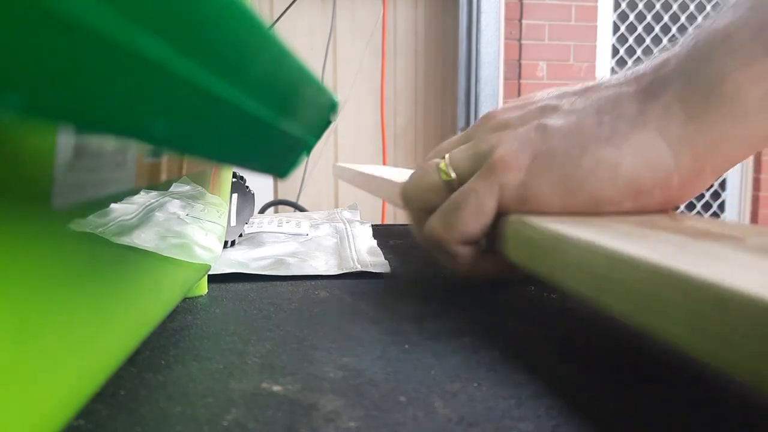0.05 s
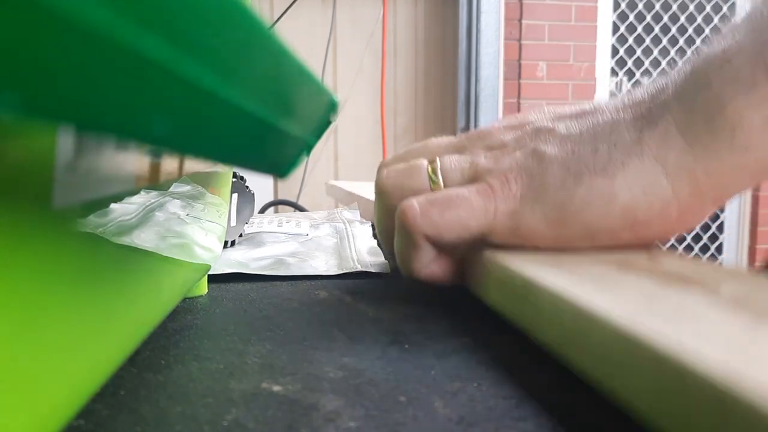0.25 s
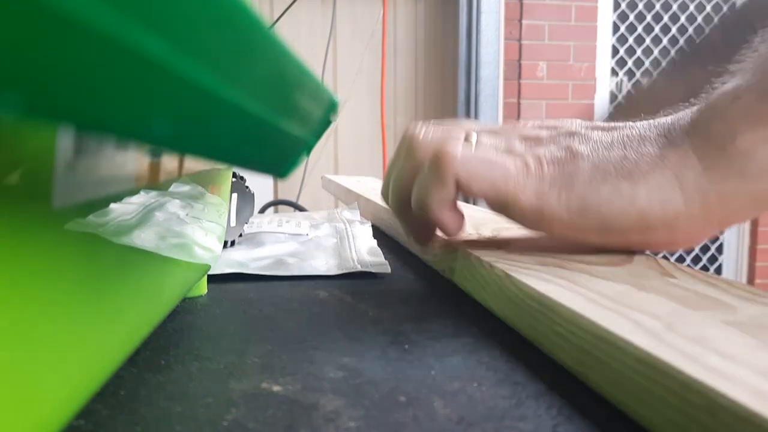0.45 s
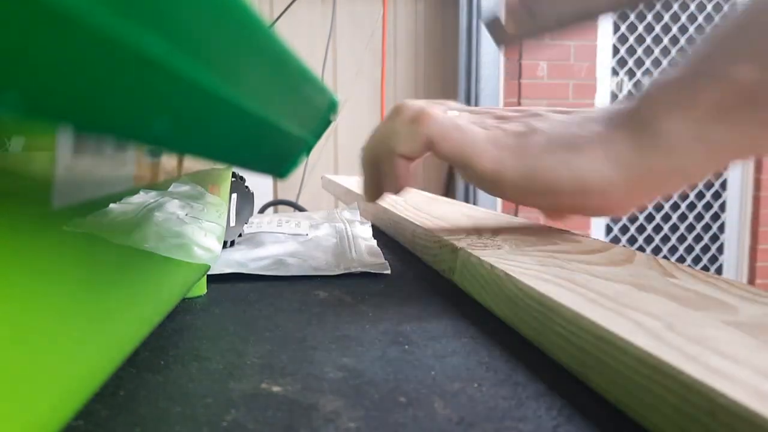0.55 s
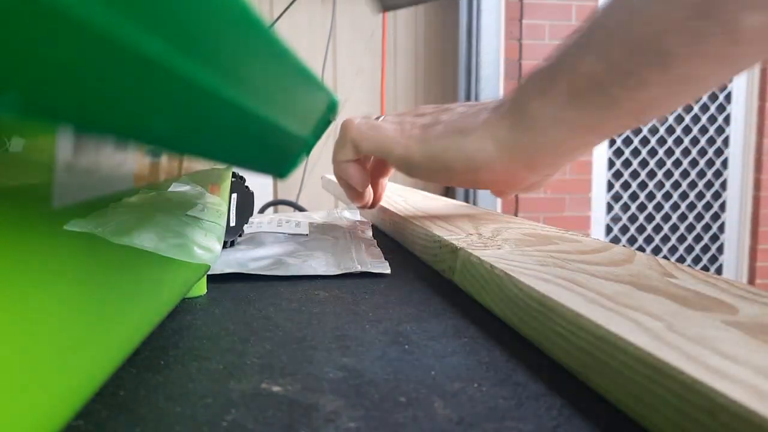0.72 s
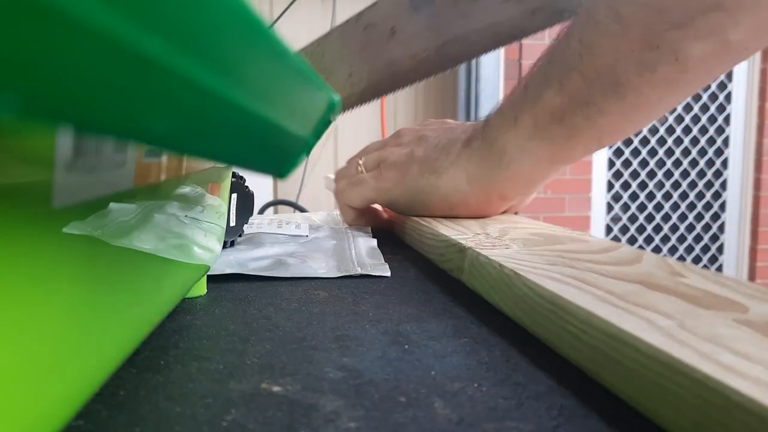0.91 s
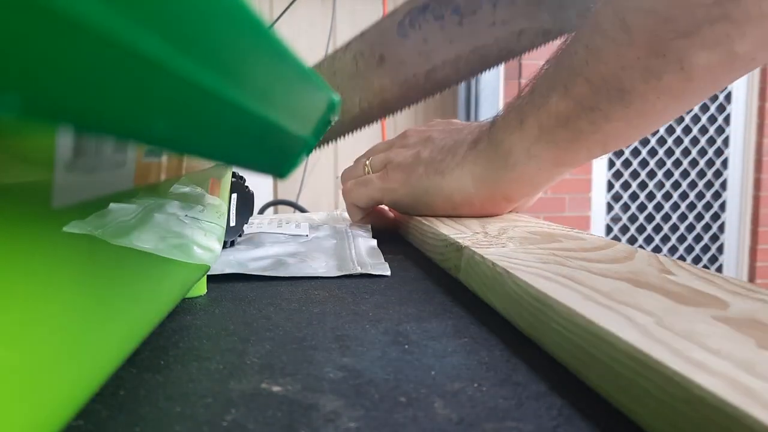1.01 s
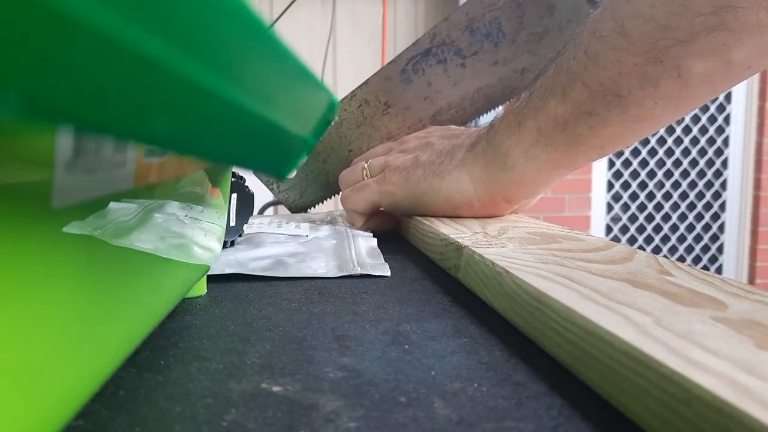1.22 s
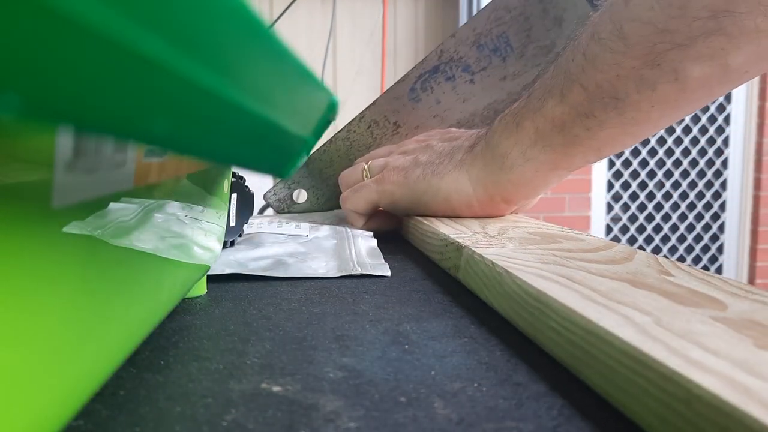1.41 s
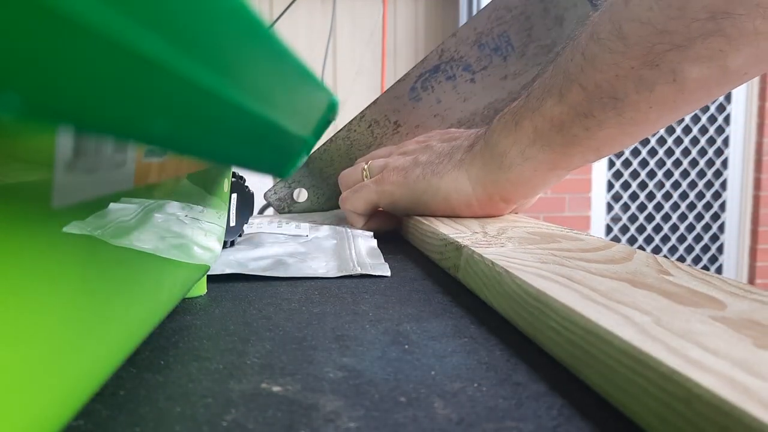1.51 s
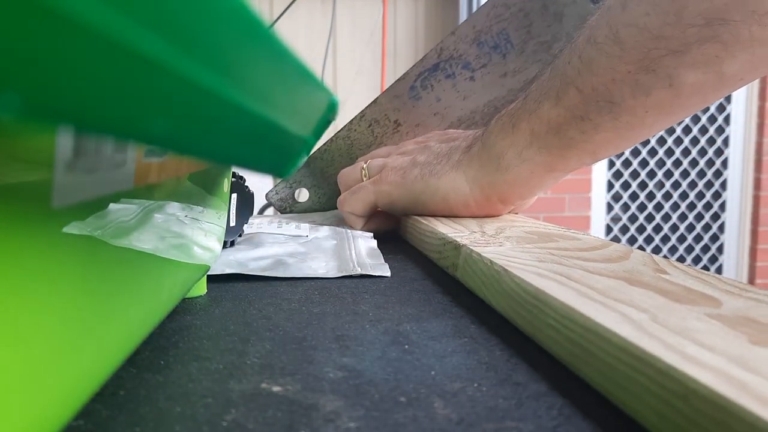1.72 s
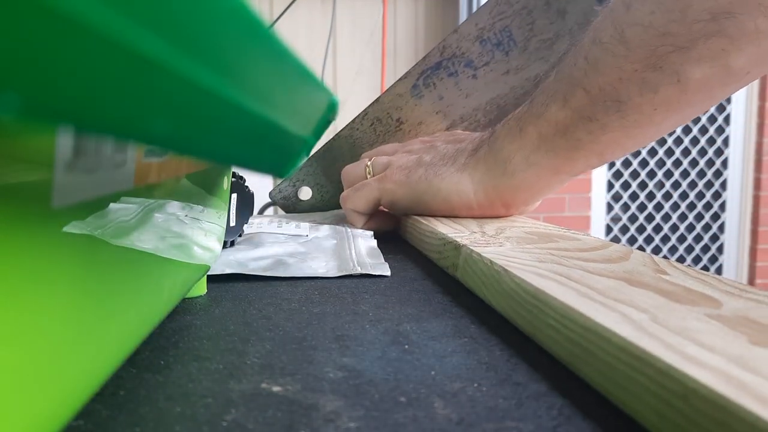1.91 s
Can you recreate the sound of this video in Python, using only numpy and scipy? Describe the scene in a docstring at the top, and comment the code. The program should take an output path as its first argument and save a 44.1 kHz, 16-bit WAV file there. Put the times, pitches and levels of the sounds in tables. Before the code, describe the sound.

A wooden board is set on a workbench: light sliding from the start, a rasp swelling near 0.2 s, and loud hollow knocks at 0.2-0.35 s with a sharp tick, smaller bounces to 0.53 s and thin squeaks. Quieter rubbing follows. At 0.92 s a tick and a strong short scrape, with squeaks until 1.3 s. Soft taps near 1.45 s, gentle rubs at 1.6 and 1.85 s, over faint yard wash.

```python
"""A pine board is set down on a workbench in an open shed, over the quiet wash of the yard.
Sliding is under way from the start: grain catches ring the wood, filtered noise rasps and hisses.
Board and bench soon knock and bounce, as short pushes on their modes; thin wavering squeaks, likely
a blade being rubbed, come among the knocks; hard edges tick now and then, as short bursts of noise.
The left microphone is nearer the bench and dull in the treble."""
import sys
import numpy as np
from scipy import signal
from scipy.io import wavfile
from scipy.ndimage import uniform_filter1d

SR = 44100
rng = np.random.default_rng(int(sys.argv[2]) if len(sys.argv) > 2 else 0)


def amplitude_ratio(level_db):
    """Convert a level in decibels to the matching linear amplitude (field) ratio."""
    exponent = np.asarray(level_db, float) / 20
    return 10 ** exponent


def persist_wave(psi):
    """Save psi, clipped to +-1, as 16-bit WAV."""
    counts = np.round(np.clip(psi, -1, 1) * 32767).astype(np.int16)
    wavfile.write(sys.argv[1], SR, np.atleast_2d(counts).T)


N = 85995  # samples

# Modes of the pine board. Each row: frequency in Hz, left level in dB, right level in dB, t60 in s.
BOARD_MODES = [(186.4, -1.5, -4, 0.19), (269, -14.5, -6, 0.044), (334.7, 3.5, -2.5, 0.11),
               (382, -7, -7, 0.14), (409.1, 3, -1, 0.076), (490, -1, -27, 0.074), (797.4, -7, -24, 0.054),
               (1527, -33, -7, 0.04)]
# Modes of the workbench. Each row: frequency in Hz, left level in dB, right level in dB, t60 in s.
BENCH_MODES = [(75.6, -37, -34, 1), (123.8, -8, -11, 0.29), (253.9, -9.5, -20.5, 0.17),
               (321.2, -8, -8, 0.18), (394.4, -4, -18, 0.11), (455.3, 8, -20, 0.087),
               (551.5, -9, -6.5, 0.059), (641.6, -9, -27, 0.19), (821.6, -5, -25.5, 0.052),
               (951.5, -9.5, -16, 0.072), (1265, -2, -7, 0.02), (1731, -21, 1, 0.036)]
# Response of the left microphone to the noises and squeaks. Each row: frequency in Hz, gain in dB.
LEFT_RESPONSE = [(900, 7), (2500, -2), (5000, -5.5), (6500, -22), (9000, -20), (14000, -14)]


def evened(x):
    """Scales to unit rms."""
    return x / np.sqrt(np.mean(x ** 2) + 1e-20)


def read(points, hz):
    """Reads a spectrum in dB on a log frequency axis."""
    f, value = np.transpose(points)
    return np.interp(np.log(hz + 1), np.log(f + 1), value)


def colour(x, *spectra):
    """Minimum-phase filter with the summed dB shape, so nothing sounds ahead of its cause."""
    hz = np.abs(np.fft.fftfreq(4096, 1 / SR))
    log_gain = np.log(amplitude_ratio(sum(read(s, hz) for s in spectra)))
    phase = -signal.hilbert(log_gain).imag
    taps = np.fft.ifft(np.exp(log_gain + 1j * phase)).real[:2048]
    return signal.oaconvolve(x, taps)[:N]


def microphones(left, right, shape):
    """Gives both sides the source's colour, and the left one its microphone's response too."""
    return np.array([colour(left, shape, LEFT_RESPONSE), colour(right, shape)])


def ring(force, modes):
    """Rings decaying sines by a force; each swells over a cycle or so and its right phase lags."""
    swell_cycles, lag_s = 0.39, 0.0001
    t = np.arange(SR // 2) / SR
    heard_at = t - np.array([[0], [lag_s]])
    body = np.zeros((2, len(t)))
    for hz, left_db, right_db, t60 in modes:
        decay = amplitude_ratio([[left_db], [right_db]] - 60 * t / t60)
        swell = 1 - np.exp(-t * hz / swell_cycles)
        body += decay * swell * np.sin(2 * np.pi * hz * heard_at)
    return signal.fftconvolve(force[None], body, axes=1)[:, :N]


def air():
    """The quiet wash of the yard: patchy noise, shared by both sides in the bass, apart above."""
    # Colour of the wash. Each row: frequency in Hz, relative level in dB per Hz.
    wash = [(60, -7), (90, 9.5), (200, -6.5), (600, -8), (1000, -22), (2500, -35.5), (4700, -32),
            (9500, -43.5), (16000, -36)]
    # Balance of the microphones. Each row: frequency in Hz, left minus right in dB.
    balance = [(100, -3), (500, 7), (1600, 11), (4500, -7.5), (9000, -17.5), (15000, -10.5)]
    level_db, same_up_to_hz, patch_db = -57.5, 610, 0.39
    frames, hz = N // 256 + 5, np.fft.rfftfreq(1024, 1 / SR)
    a, b, c, d, patches = rng.standard_normal((frames, 513, 5)).T
    patches = evened(uniform_filter1d(uniform_filter1d(patches, 10, axis=0), 10, axis=1))
    same = 1 / (1 + (hz[:, None] / same_up_to_hz) ** 2)
    left = a + 1j * b
    right = same * left + np.sqrt(1 - same ** 2) * (c + 1j * d)
    tilt = read(balance, hz)[:, None] / 2
    shape_db = read(wash, hz)[:, None] + patch_db * patches + np.array([tilt, -tilt])
    noise = signal.istft(np.array([left, right]) * amplitude_ratio(shape_db), nperseg=1024, noverlap=768)[1]
    return amplitude_ratio(level_db) * evened(noise[:, :N])


def streaked(x):
    """Narrow resonances come and go as the contact moves along the grain."""
    streak_db = 5  # rms
    z = signal.stft(x, nperseg=512, noverlap=384)[2]
    bands = rng.standard_normal(z.shape[:0:-1]).T
    bands = evened(uniform_filter1d(uniform_filter1d(bands, size=2, axis=0), size=24, axis=1))
    return signal.istft(z * amplitude_ratio(streak_db * bands), nperseg=512, noverlap=384)[1][:, :N]


def sliding():
    """Grain catches rattle the wood; the faces rasp and hiss. The hand never holds quite still."""
    # Strokes. Each row: start, fastest moment and end in seconds, then the levels of
    # the rumble in the wood, the rasp and the hiss in dB.
    strokes = [(-.3, 0.002, 0.28, -44.5, -58, -67.5), (0.033, 0.193, 0.64, -41, -32.5, -49.5),
               (0.639, 0.877, 1.76, -63.5, -47, -59), (0.906, 0.952, 1.107, -22.5, -34, -65),
               (1.477, 1.61, 1.767, -36, -48, -71), (1.771, 1.836, 2.32, -37, -43.5, -62.5)]
    # Colour of the rasp. Each row: frequency in Hz, gain in dB.
    rasp_shape = [(900, -9.5), (2200, -3.5), (3200, -10.5), (5000, -13), (8000, -23)]
    # Colour of the hiss. Each row: frequency in Hz, gain in dB.
    hiss_shape = [(3000, -23.5), (5000, 7.5), (9500, -4.5), (12500, -10.5), (16000, -24)]
    still_db, bench_db = -71.5, -9
    grains_per_s, grain_db, bright = 830, 3, 0.42
    t, level = np.arange(N) / SR, np.zeros((3, N))
    level[0] = amplitude_ratio(still_db)
    for start, fastest, end, *db in strokes:
        speed = np.interp(t, [start, fastest, end], [0, 1, 0])
        level += amplitude_ratio(db)[:, None] * speed ** 2

    # Random catches of either sign, each widened to 16 samples and followed by a weaker opposite push
    caught = rng.random((2, N)) < grains_per_s / SR
    size = amplitude_ratio(grain_db * np.minimum(rng.exponential(1, (2, N)), 5)) * caught
    force = evened(uniform_filter1d(size * rng.choice([-1, 1], (2, N)), size=16, axis=1))
    force = level[0] * (force - bright * np.roll(force, 16, axis=1)) / SR ** .5
    rumble = ring(force[0], BOARD_MODES) + amplitude_ratio(bench_db) * ring(force[1], BENCH_MODES)

    a, b, c, d, flicker = rng.standard_normal((N, 5)).T
    flicker_gain = amplitude_ratio(1.5 * evened(uniform_filter1d(flicker, size=300)))
    rasp_level, hiss_level = level[1:] * flicker_gain
    rasp = microphones(a * rasp_level, b * rasp_level, rasp_shape)
    hiss = microphones(c * hiss_level, d * hiss_level, hiss_shape)
    return rumble + streaked(rasp + hiss)


def knocks():
    """Each contact is a short smooth push on board and bench; a woody clack favours short ones."""
    # Contacts. Each row: start in seconds, push on the board in dB, push on the bench in dB,
    # contact time in ms.
    contacts = [(0.1432, -38, -53, 0.93), (0.17, -79, -29, 1.7), (0.2017, -8.5, -14.5, 0.74),
                (0.2142, -46, -26, 4.4), (0.2506, -11, -22, 1.11), (0.3254, -40.5, -12, 0.54),
                (0.3278, -41, -10, .7), (.340, -18, -29, 2.3), (0.429, -25.5, -25, 1.25),
                (0.453, -21.5, -40.5, 2.45), (.492, -43, -20, 1.9), (0.527, -32, -34, 2.94),
                (0.872, -43, -53.5, 0.58), (.950, -68, -31.5, 0.45), (0.966, -32.5, -46, 3.5),
                (1.001, -33, -44.5, 2.97), (1.032, -32, -36, 2.6), (1.088, -42, -37.5, 3.6),
                (1.4412, -48, -37.5, 0.99), (1.447, -40.5, -26, 1.5), (1.450, -37, -23.5, 4.7),
                (1.47, -40.5, -35.5, 2.5), (1.632, -35, -39.5, 3.3), (1.881, -37.5, -37, 1.4)]
    # Colour of the clack. Each row: frequency in Hz, gain in dB.
    clack_shape = [(150, -25.5), (450, 5), (1100, -3), (2500, -14), (4500, -55.5)]
    clack_db, clack_left_db, clack_decay_s, board_cut_hz = -10.5, 1.5, 0.0093, 131
    t, push, clack = np.arange(N) / SR, np.zeros((2, N)), np.zeros(N)
    for start, board_db, bench_db, ms in contacts:
        progress = np.clip((t - start) / (ms / 1000), 0, 1)
        pulse = np.sin(np.pi * progress) ** 2
        push += amplitude_ratio([[board_db], [bench_db]]) * pulse / pulse.sum()
        hardness = (amplitude_ratio(board_db) + amplitude_ratio(bench_db)) / ms ** 2
        clack += hardness * progress * np.exp(-np.maximum(t - start, 0) / clack_decay_s)
    left, right = rng.standard_normal((N, 2)).T * clack * amplitude_ratio(clack_db)
    bass_cut = signal.butter(2, board_cut_hz, "high", fs=SR)
    board = signal.lfilter(*bass_cut, ring(push[0], BOARD_MODES))
    bench = ring(push[1], BENCH_MODES)
    return microphones(left * amplitude_ratio(clack_left_db), right, clack_shape) - board - bench


def whistles():
    """Thin squeaks, likely a blade being rubbed: narrow lines catch quickly, waver and fade."""
    # Thin squeaks. Each row: start in seconds, length in seconds, frequency in Hz, level in dB.
    squeaks = [(.257, .07, 5780, -48), (.275, .08, 4290, -57), (.325, .06, 4450, -57),
               (.365, .09, 4580, -54), (.43, .2, 4520, -63), (.70, .09, 2280, -70), (.77, .11, 2600, -67),
               (.965, .12, 4590, -54), (.98, .04, 6550, -65), (1.03, .1, 5780, -65),
               (1.055, .09, 4220, -55), (1.08, .06, 4460, -59), (1.11, .06, 4690, -59),
               (1.155, .17, 4690, -60), (1.15, .12, 4230, -69)]
    width_hz, clear, rise = 130, 1.8, 0.45  # clear: steady part against unit-rms fuzz
    waver_share, break_db = 0.005, 1.5  # rms, of the frequency and of the level
    out = np.zeros(N)
    for start, length, hz, db in squeaks:
        t = np.arange(0, length, 1 / SR)
        a, c, d = rng.standard_normal((SR // 2, 3)).T
        pole = np.exp(-np.pi * width_hz / SR)
        fuzz = evened(signal.lfilter([1], [1, -2 * pole, pole ** 2], a))[-len(t):]
        waver, gaps = (evened(uniform_filter1d(uniform_filter1d(v, size=500), size=300))[:len(t)]
                       for v in (c, d))
        tone = np.sin(2 * np.pi * np.cumsum(hz * (1 + waver_share * waver)) / SR)
        line = evened((clear + fuzz) * tone * amplitude_ratio(break_db * gaps))
        envelope = np.sin(np.pi * (t / length) ** rise)
        part = out[round(start * SR):][:len(t)]
        part += amplitude_ratio(db) * envelope * line
    return np.array([colour(out, LEFT_RESPONSE), out])


def ticks():
    """Sharp ticks of hard edges: tiny bursts of noise that start at once and decay."""
    # Ticks. Each row: start in seconds, level in dB, decay time constant in ms.
    edge_hits = [(0.3291, -33.5, 2), (0.9185, -29, 1.7), (1.171, -59, 1.5), (1.442, -51, 2.3),
                 (1.564, -57, 4.7)]
    # Colour of the ticks. Each row: frequency in Hz, gain in dB.
    tick_shape = [(800, 0.5), (6000, -1), (10000, -10.5), (14000, -1.5), (16000, -31.5)]
    t, level = np.arange(N) / SR, np.zeros(N)
    for start, db, ms in edge_hits:
        level += amplitude_ratio(db) * (t > start) * np.exp(-np.maximum(t - start, 0) * 1000 / ms)
    left, right = rng.standard_normal((N, 2)).T * level
    return microphones(left, right, tick_shape)


def shed(x):
    """Sparse reflections of random sign, different for each side, dull in the treble."""
    room_db, dull_above_hz, t60 = -13, 1300, 0.38
    taps = np.zeros((2, SR // 2))
    # One reflection at random in every 20 samples
    at = np.arange(150, SR // 2 - 20, 20) + rng.integers(0, 20, (2, (SR // 2 - 151) // 20))
    np.put_along_axis(taps, at, rng.choice([-1., 1.], at.shape), 1)
    taps *= amplitude_ratio(-60 * np.arange(SR // 2) / SR / t60)
    taps = signal.lfilter(*signal.butter(2, dull_above_hz, fs=SR), taps / np.linalg.norm(taps[0]))
    return x + amplitude_ratio(room_db) * signal.fftconvolve(x, taps, axes=1)[:, :N]


def scene():
    """Bench sounds in the shed over the yard."""
    return shed(knocks() + ticks() + sliding() + whistles()) + air()


def low_pass(x):
    """Removes everything above the highest recorded frequency."""
    return signal.sosfilt(signal.butter(12, 16100, fs=SR, output="sos"), x)


def record(dry):
    """Bass cut of the microphones at 75 Hz, then clipping at full scale."""
    cut = signal.lfilter(*signal.butter(2, 75, "high", fs=SR), dry)
    mix = np.clip(cut, -1, 1)
    return low_pass(mix)


dry = scene()
out = record(dry)
persist_wave(out)
```